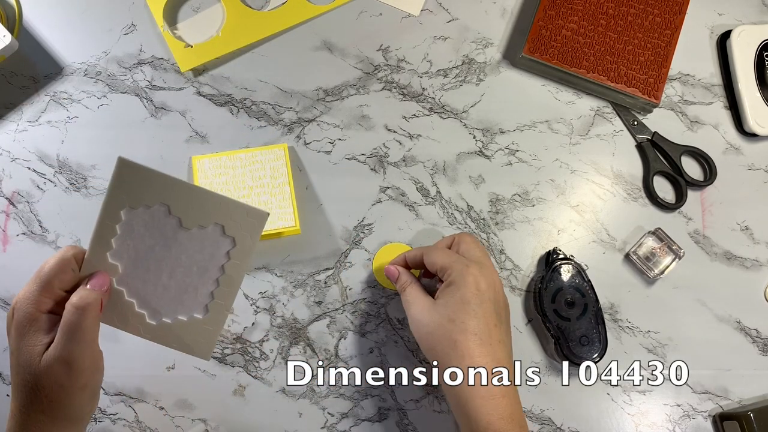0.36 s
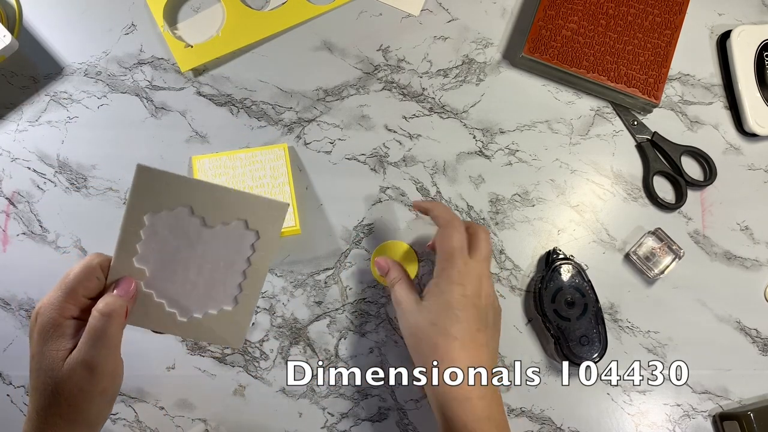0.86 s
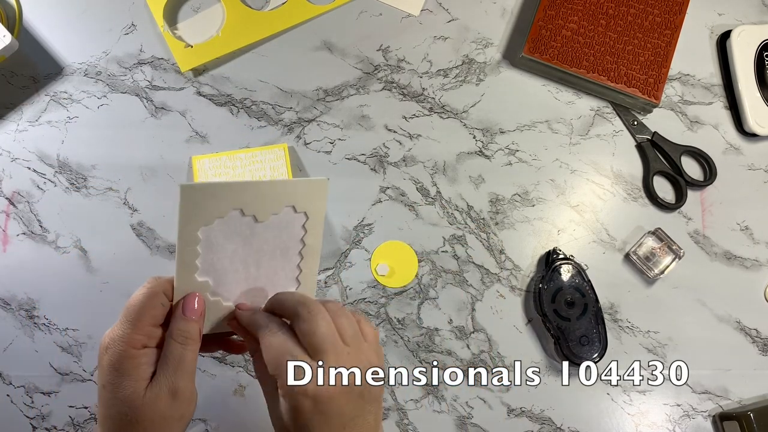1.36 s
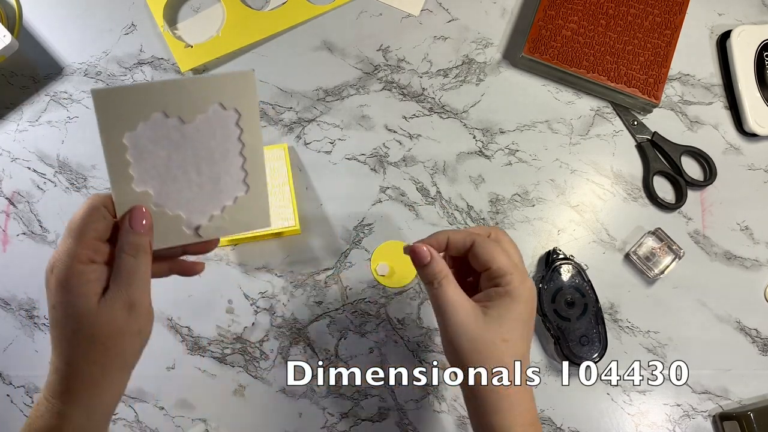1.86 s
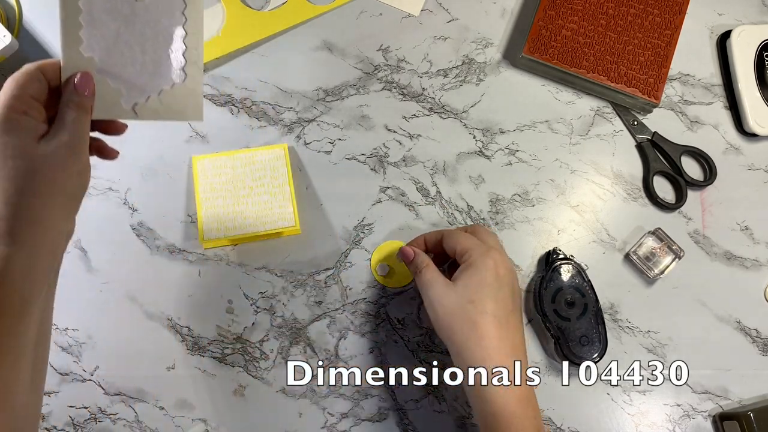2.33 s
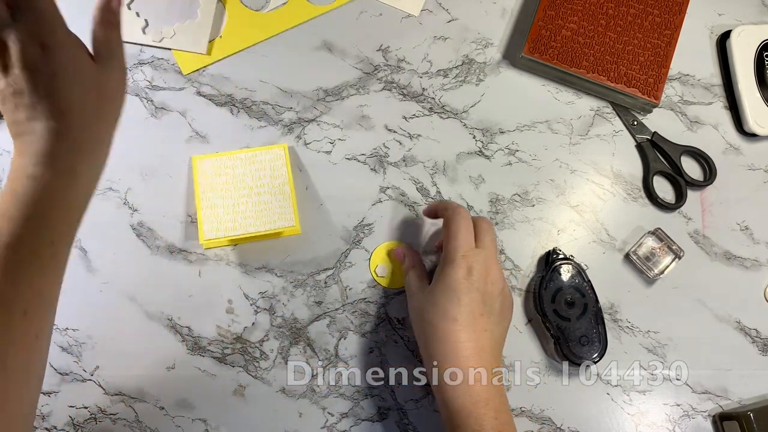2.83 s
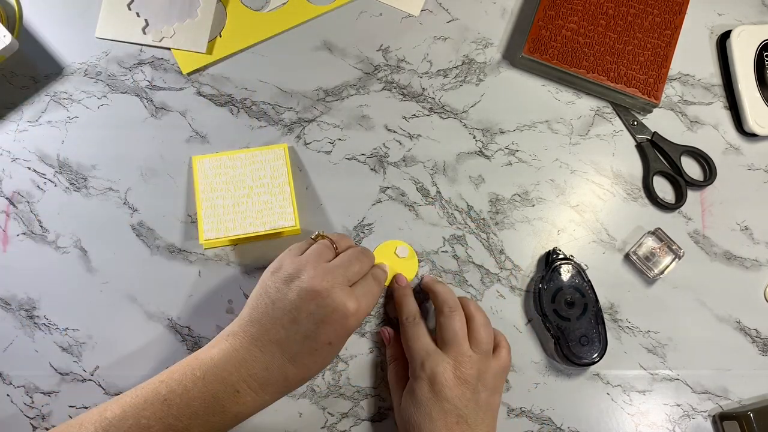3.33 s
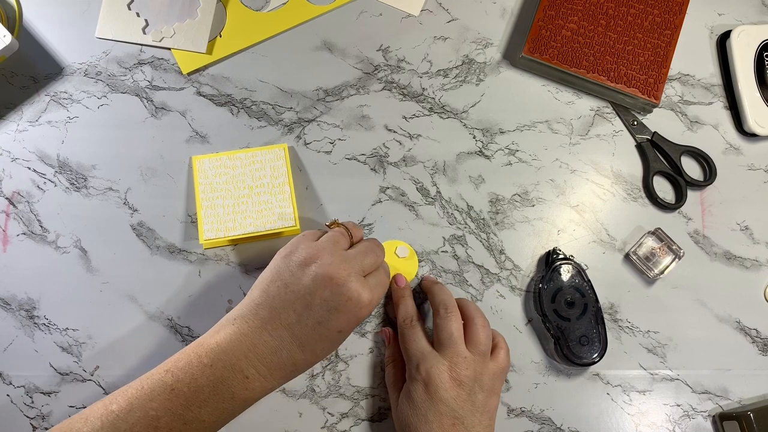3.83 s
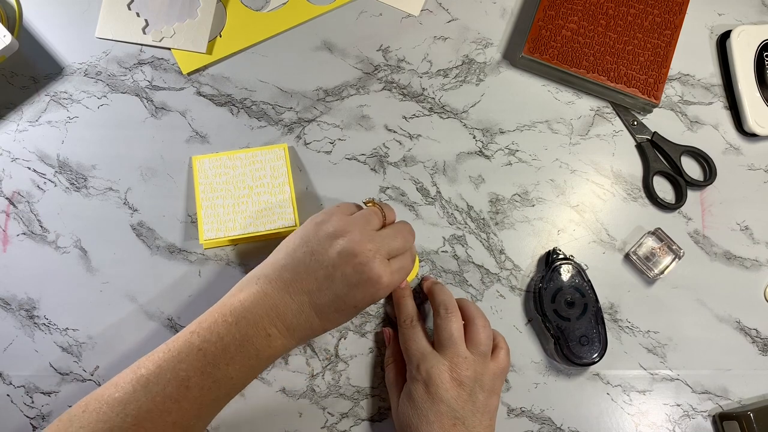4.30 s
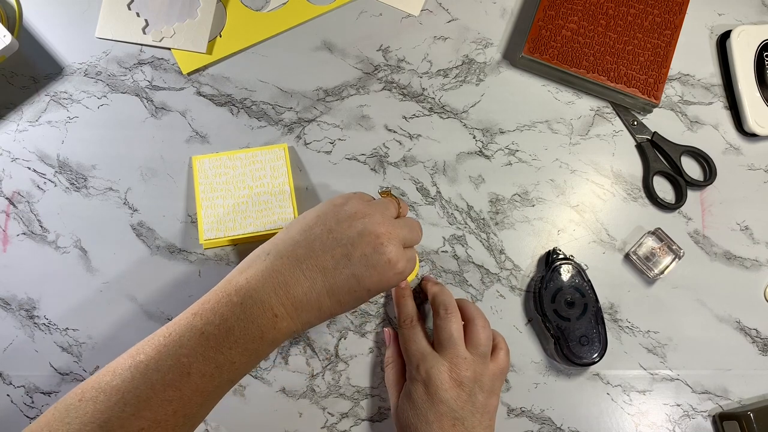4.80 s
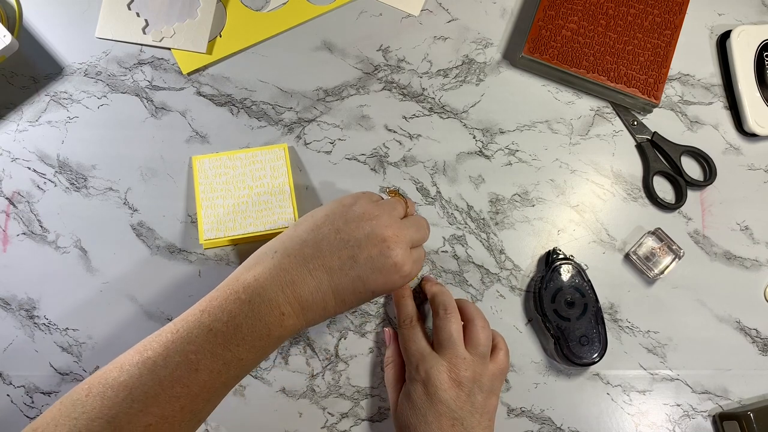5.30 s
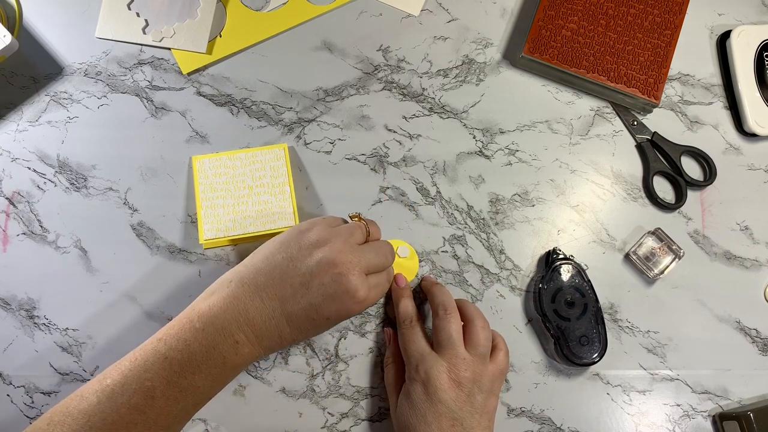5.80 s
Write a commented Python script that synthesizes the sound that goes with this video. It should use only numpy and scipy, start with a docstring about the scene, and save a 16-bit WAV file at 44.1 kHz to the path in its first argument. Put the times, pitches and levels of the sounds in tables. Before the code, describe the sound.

Close, faint craft-table handling: crisp adhesive clicks, card knocks and rustling in two early bursts, then sparse little ticks over low room rumble.

```python
"""Glue stretches and a card sheet rustles at once, as fingers peel small foam pads off the sheet and
press them onto paper on a hard table. Snaps and nail ticks are short noise bursts; the card and the
table ring as fading sine waves; rubbing and slides are shaped noise.
A small damped room adds dense echoes, a low rumble and a faint hiss. Two microphone ports, a hand apart."""
import sys
import numpy as np
from scipy import signal
from scipy.fft import rfft, irfft
from scipy.io import wavfile
from scipy.ndimage import uniform_filter1d

SR = 44100
rng = np.random.default_rng(int(sys.argv[2]) if len(sys.argv) > 2 else 0)


def inscribe(sig):
    """Save sig as 16-bit PCM at rate SR to the path in sys.argv[1].

    A 1-D sig is mono; a 2-D sig holds one channel per row.
    Samples are clipped to [-1, 1] before scaling.
    """
    pcm = np.round(np.clip(np.atleast_2d(sig).T, -1, 1) * 32767)
    wavfile.write(sys.argv[1], SR, pcm.astype(np.int16))


def rack_gain(trim_db):
    """Turn a fader trim in dB into the linear factor to multiply a signal by."""
    fader = np.asarray(trim_db, float)
    return 10 ** (fader / 20)


N = 271479   # length in samples

# strokes that stretch glue threads and slide skin on paper: loudest t/s, level/dB, swell t/s, fade t/s
PEEL_STROKES = [(.002, -50.5, .05, 0.078), (.12, -55.5, .15, 0.048), (.25, -72.5, .5, 0.28),
                (.7, -80.5, .2, 0.51), (.761, -57, 0.031, 0.023), (1.48, -67.5, 0.025, 0.3),
                (1.595, -48.5, .03, 0.14), (1.665, -54, .045, 0.1), (2.82, -52.5, .05, 0.097),
                (4.0, -62.5, .03, 0.14), (4.04, -62.5, 0.045, 0.14), (4.095, -51, .02, .006),
                (4.105, -60, .01, 0.094), (4.31, -76.5, .09, .12), (5.146, -56.5, .015, 0.018),
                (5.157, -67, 0.011, 0.037), (5.2, -83, .06, 0.039), (5.385, -69.5, 0.0097, 0.026),
                (5.419, -52, .007, 0.065), (5.45, -68, .04, 0.066)]
# strokes that flex and rustle the card sheet: loudest t/s, level/dB, swell t/s, fade t/s
RUSTLE_STROKES = [(.05, -56, 0.21, 0.11), (.13, -55, 0.08, 0.19), (.23, -68, 0.22, 0.049),
                  (.33, -72, 0.26, 0.083), (1.225, -68, 0.03, 0.077), (1.49, -72, 0.064, 0.051),
                  (1.58, -55.5, 0.032, 0.097), (1.645, -50.5, 0.012, 0.049), (1.675, -51.5, 0.03, 0.044),
                  (1.70, -49, 0.015, 0.055), (2.81, -67, 0.041, 0.082), (2.86, -64.5, 0.079, 0.02),
                  (4.105, -66, 0.023, 0.11), (5.446, -67.5, 0.065, 0.057), (5.155, -78, .015, 0.034),
                  (5.767, -70, 0.016, 0.034), (.77, -71, 0.016, 0.065)]
# colour of the peeling glue: f/Hz, relative level per Hz/dB
BRIGHT_COLOUR = [(2500, -13), (5000, -5.5), (8000, -8.5), (12000, -5.5), (16000, -14)]
# colour of the rustling sheet: f/Hz, relative level per Hz/dB
DULL_COLOUR = [(240, -37), (400, -4), (1050, -12.5), (1390, -5), (2040, -11.5), (3310, -24.5),
               (5000, -25.5), (6500, -44), (11000, -120)]
# a hand slides on the table or the sheet and excites one resonance:
# loudest t/s, level before uneven grip/dB, swell t/s, fade t/s, centre f/Hz, half width/share of centre
HAND_SLIDES = [(0.072, -53, 0.13, 0.21, 2080, 0.18), (0.31, -77, 0.16, 0.1, 2500, 0.038),
               (0.11, -59.5, 0.091, 0.22, 1000, 0.087), (0.13, -70, .2, 0.12, 3000, 0.32),
               (.07, -57.5, .08, .25, 600, 0.17), (4.53, -80, 0.12, 0.3, 617, 0.06),
               (5.38, -75, .09, .05, 700, .3), (4.74, -83.5, 0.15, 0.089, 613, 0.05),
               (2.862, -65, 0.042, 0.029, 4000, 0.22), (1.275, -66, 0.0058, 0.0098, 3100, 0.099),
               (4.55, -80, 0.18, 0.11, 900, 0.27), (5.421, -62, .008, .03, 4570, 0.042),
               (5.447, -61.5, .006, .015, 4600, 0.052), (5.762, -54.5, 0.012, 0.024, 7440, 0.15),
               (1.3, -71, 0.18, 0.16, 422, 0.08)]
# colour of rumble and hiss: f/Hz, relative level per Hz/dB
ROOM_TONE_COLOUR = [(15, -30), (25, -11), (45, -5.5), (62, 1.5), (85, -2), (105, -9), (122, -4), (145, -11),
                    (224, -12.5), (290, -16.5), (382, -25), (480, -34.5), (888, -45.5), (1700, -51.5),
                    (4000, -54), (8400, -56), (12000, -55.5), (14800, -56), (16000, -68)]
# how alike the room tone is at left and right: f/Hz, likeness/0 to 1
ROOM_TONE_LIKENESS = [(30, 0.52), (60, 0.88), (180, 0.91), (550, 0.28), (1650, 0.74), (4970, 0.1),
                      (15000, 0.4)]
# nails and knuckles knock the card:
# t/s, card ring level/dB, tick level/dB, crack level/dB, f above which the ring weakens/Hz
CARD_KNOCKS = [(0.0166, -46, -64.5, -63.5, 3000), (0.0297, -40, -65, -57, 3000),
               (0.0392, -45, -55, -35.5, 2000), (1.215, -45, -85, -53, 3010), (1.2252, -44, -90, -82, 1010),
               (1.2285, -45, -90, -82, 980), (1.2735, -54.5, -60.5, -63, 1110),
               (1.483, -40, -64, -49.5, 2080), (1.5778, -38, -43, -35.5, 2980),
               (1.5832, -58, -60.5, -45, 3000), (1.5965, -43.5, -51.5, -58, 2000),
               (1.6011, -44, -38.5, -39.5, 3000), (1.6401, -37.5, -63, -49, 1210),
               (1.654, -32.5, -54, -43.5, 1200), (1.6565, -37.5, -68.5, -62, 1000),
               (1.6741, -38, -60, -57.5, 1180), (1.6847, -46, -57.5, -61.5, 2000),
               (1.6945, -42.5, -59.5, -50, 1475), (1.7095, -33.5, -57.5, -42, 1200),
               (1.7123, -32.5, -46.5, -37.5, 1510), (1.7153, -36, -54.5, -55.5, 1200),
               (1.7183, -39.5, -60, -49, 1200), (2.8225, -59, -66, -50, 2470),
               (2.8495, -59, -41, -43.5, 2500), (2.8583, -61, -40, -42, 3000),
               (3.309, -65.5, -53, -53, 1175), (3.3117, -47.5, -57.5, -60.5, 452),
               (4.0973, -46.5, -59.5, -44.5, 1800), (5.1542, -63.5, -71, -86, 2000),
               (5.761, -67.5, -67, -67.5, 2500), (5.77, -77, -56.5, -66, 2500),
               (5.797, -75, -78, -73, 2500)]
# glue threads snap at the fingertips: t/s, bright snap level/dB, crack level/dB, snap centre f/Hz
GLUE_SNAPS = [(0.0171, -25.5, -39.5, 11500), (0.0306, -22.5, -37, 11580), (0.03, -31.5, -38.5, 6530),
              (0.038, -33, -49, 12000), (0.584, -60, -88, 7700), (0.593, -60, -82, 6900),
              (0.7629, -31.5, -51, 8700), (0.7657, -51, -47.5, 8100), (1.3094, -49.5, -65, 10300),
              (1.4288, -64, -73.5, 8440), (1.452, -56.5, -70, 11400), (1.4693, -45.5, -57, 11500),
              (1.471, -33.5, -75, 12000), (1.4785, -42, -50.5, 10000), (1.4937, -45.5, -52.5, 11500),
              (1.4958, -46.5, -49, 11500), (1.522, -44, -50.5, 10300), (1.542, -41.5, -48, 11000),
              (1.5792, -26.5, -42.5, 11500), (1.597, -37.5, -46.5, 7000), (1.6012, -34, -49, 10980),
              (1.6393, -35, -40, 10500), (1.6547, -25.5, -36, 11000), (1.66, -38, -51.5, 9000),
              (1.6666, -24.5, -39.5, 8540), (1.668, -31, -30.5, 7910), (1.6748, -26.5, -47.5, 10800),
              (1.6844, -28, -46, 11400), (2.33, -63, -71, 10440), (2.6414, -64.5, -92, 8860),
              (2.7925, -58, -64, 7450), (2.814, -41, -53, 6000), (2.8141, -28.5, -45, 10750),
              (2.818, -40, -57, 8050), (2.915, -65.5, -76, 8000), (3.229, -58, -74, 11500),
              (3.515, -44.5, -69, 8840), (3.7389, -57, -69, 9750), (3.757, -32, -68, 11800),
              (3.989, -51, -81, 13250), (4.0008, -54.5, -74.5, 9900), (4.0128, -53, -64.5, 8700),
              (4.0204, -37, -64, 9600), (4.058, -58.5, -60.5, 7840), (4.0935, -36.5, -46, 7000),
              (4.0972, -28, -52.5, 11000), (4.0956, -28.5, -42, 5770), (4.097, -22, -42, 8800),
              (4.0995, -40, -46.5, 7000), (4.4722, -51.5, -61.5, 8400), (5.1467, -50, -64, 8000),
              (5.1544, -46, -82, 11000), (5.181, -59.5, -82, 10150), (5.2052, -64, -90, 9660),
              (5.4115, -54.5, -68, 12000), (5.4178, -53.5, -69, 5500), (5.427, -53, -67, 10500),
              (5.4429, -53, -59, 9500), (5.4446, -53, -47.5, 8500), (5.4463, -42, -69, 9000),
              (5.782, -59, -80, 11000), (5.9568, -34, -63, 8600)]
# ways the card sheet rings: f/Hz, relative level/dB, time to fall 60 dB t/s
CARD_MODES = [(446, -13.5, 0.02), (563.8, -8.5, 0.014), (633, -6, 0.015), (787, -5.5, 0.023),
              (880, -3, 0.019), (1005, -4.5, 0.02), (1075, -6.5, 0.017), (1330, -11, 0.015),
              (1646, -4, 0.025), (1950, -10, 0.018), (2360, -12.5, 0.021), (2580, -16.5, 0.018),
              (2780, -19, 0.015)]
# the hand lands on the table: t/s, level/dB
TABLE_THUDS = [(0.037, -44), (1.224, -47), (1.6, -50), (1.654, -37.5), (1.709, -35.5), (2.815, -49),
               (3.311, -36.5), (4.1, -47)]
# ways the table rings: f/Hz, relative level/dB, time to fall 60 dB t/s
TABLE_MODES = [(146, -3, 0.043), (181, -1.5, .05), (226, 1, 0.06), (262, -2.5, 0.059), (286, -1, 0.038),
               (350, -4, 0.036), (400, -5, 0.035), (455, -5, 0.055)]
# echoes by band: centre f/Hz, time to fall 60 dB t/s, noise level before cutting to the band/dB,
# left-right likeness/0 to 1
ECHO_BANDS = [(307, 0.13, -4.5, .85), (1250, 0.12, -5.5, .8), (2930, 0.1, -4.5, 0.57),
              (5500, 0.11, -7, 0.6), (9000, 0.079, -7.5, 0.93), (12700, 0.17, -10, 0.55)]
# narrow gaps in the treble: from f/Hz, to f/Hz
TREBLE_GAPS = [(9150, 10150), (12800, 13900)]

TOP_HZ = 16200   # steep upper end of the sound
ROOM_TONE_DB = -51.5
FINGERS_LAG_MS = -0.28   # left lag: the fingertips are nearer the left port
RING_LAG_MS = -0.027   # left lag of the card's ring
RING_UNDER_CRACK_DB = -26.5   # how much of a crack sets the card ringing
NAIL_HZ = 5400   # centre of a nail's tick
STROKE_RANGE_DB, STROKE_BEND = 30, 1.5   # dB lost in a swell or fade time; loss quickens away from the peak
CARD_SPREAD_DB = 4   # each blow finds each card mode stronger or weaker by this spread
BENDING_DELAY_MS = 1.5   # bending waves of 1 kHz arrive this late; lower ones later, higher ones sooner
SKID_DB, SKIDS_PER_S = 3.5, 40   # the skin grips unevenly: spread and rate


def rms_one(x):
    """Scales a sound to rms 1."""
    return x / np.sqrt(np.mean(x ** 2) + 1e-20)


def at_hz(points, hz):
    """Reads a table at any frequency, along a log frequency scale."""
    table_hz, value = np.array(points).T
    return np.interp(np.log(hz + 1), np.log(table_hz), value)


def coloured(noise, spectrum):
    """Gives noise a spectrum in dB per Hz, at rms 1."""
    size = noise.shape[-1]
    gain = rack_gain(at_hz(spectrum, np.fft.rfftfreq(size, 1 / SR)))
    return rms_one(irfft(rfft(noise) * gain, size))


def band(x, low_hz, high_hz):
    """Keeps only the frequencies from low_hz to high_hz, with soft edges."""
    edges = [low_hz, min(high_hz, .45 * SR)]
    return signal.sosfilt(signal.butter(2, edges, "band", fs=SR, output="sos"), x)


def left_and_right(mid, side, alike):
    """Mixes two independent noises into two channels that are alike by a share of 0 to 1."""
    alike = np.clip(alike, 0, 1)
    return np.sqrt(1 + alike) * mid + np.sqrt(1 - alike) * side * [[1], [-1]]


def add(out, s, sound, left_lag_ms=0.):
    """Lays a sound into both channels, the nearer port first."""
    sound = np.broadcast_to(sound, (2, sound.shape[-1]))
    for channel, shift in enumerate((left_lag_ms / 2000, -left_lag_ms / 2000)):
        at = max(round((s + shift) * SR), 0)   # nothing can start before zero
        out[channel, at:at + sound.shape[-1]] += sound[channel, :N - at]


def strokes(rows):
    """Each stroke swells to its loudest moment and fades; overlapping strokes add in power."""
    t = np.arange(0, N + 8, 8) / SR   # every eighth sample is enough
    power = 0
    for s, level_db, swell, fade in rows:
        away = np.maximum((s - t) / swell, (t - s) / fade)
        power = power + rack_gain(level_db - STROKE_RANGE_DB * away ** STROKE_BEND) ** 2
    return np.interp(np.arange(N) / SR, t, np.sqrt(power))


def grains(rows, spectrum, per_s, spread_db, smooth, unlike):
    """Fibres catch and let go at random: uneven clicks over a smoother hiss, under the strokes of the hand."""
    sizes = rack_gain(spread_db * np.minimum(rng.exponential(1, N), 4)) * rng.choice([-1, 1], N)
    clicks = rms_one(sizes * (rng.random(N) < per_s / SR))
    hiss = rng.standard_normal((3, N))   # one shared by both ports, then one for each
    rough = clicks + smooth * (hiss[0] + unlike * hiss[1:])
    return coloured(rough, spectrum) * strokes(rows)


def rubbing():
    """Rubbing makes many tiny catches: glue peels nearer the left port, the sheet rustles in the middle."""
    out = np.zeros((2, N))
    peel = grains(PEEL_STROKES, BRIGHT_COLOUR, per_s=1500, spread_db=5.5, smooth=1.2, unlike=0.5)
    add(out, 0, peel, FINGERS_LAG_MS)   # the left cannot start early here, so half the lag remains
    rustle = grains(RUSTLE_STROKES, DULL_COLOUR, per_s=1100, spread_db=4.0, smooth=0.48, unlike=0.17)
    return out + rustle


def slides():
    """Skin drags over a surface: soft noise in a resonance, gripping unevenly, under the stroke."""
    t, out = np.arange(N) / SR, 0
    for *row, hz, width in HAND_SLIDES:
        grip = rack_gain(SKID_DB * np.interp(t * SKIDS_PER_S, np.arange(999), rng.standard_normal(999)))
        resonance = rms_one(band(rng.standard_normal(N), hz * (1 - width), hz * (1 + width)))
        out = out + strokes([row]) * grip * resonance
    return out


def room_tone():
    """Rumble of the house over a faint hiss; how alike the two ports are depends on the frequency."""
    hz = np.fft.rfftfreq(N, 1 / SR)
    mid, side = rfft(rng.standard_normal((2, N)))
    both = left_and_right(mid, side, at_hz(ROOM_TONE_LIKENESS, hz))
    return rack_gain(ROOM_TONE_DB) * rms_one(irfft(both * rack_gain(at_hz(ROOM_TONE_COLOUR, hz)), N))


def burst(low_hz, high_hz, decay_ms, lead_ms, unlike):
    """A click with a faint noise rising to it and dying after it; the loudest millisecond has rms 1."""
    t = np.arange(SR // 40) * 1000 / SR - 6   # milliseconds from the click
    noise = rng.standard_normal((3, len(t)))
    envelope = np.where(t > 0, np.exp(-t / decay_ms), 0.16 * np.exp(t / lead_ms))
    noisy_click = (noise[0] + unlike * noise[1:]) * envelope
    noisy_click[:, np.argmax(t > 0)] += 2.2   # the click itself
    puff = band(noisy_click, low_hz, high_hz)
    return puff / np.sqrt(uniform_filter1d(np.mean(puff ** 2, axis=0), size=SR // 1000).max())


def add_click(out, s, bright_db, crack_db, hz):
    """A bright tick around a centre pitch at the fingertips, and the duller crack of the card under it."""
    tick = burst(max(0.65 * hz, 3000), 1.4 * hz, decay_ms=0.45, lead_ms=1.5, unlike=0.35)
    crack = burst(900, 4000, decay_ms=1.2, lead_ms=2.5, unlike=0.3)
    start = s - .0063   # room for the noise that leads up to the click
    add(out, start, rack_gain(bright_db) * tick, FINGERS_LAG_MS)
    add(out, start, rack_gain(crack_db) * crack)


def strike(modes, spread_db, contact_ms, top_hz, delay_ms):
    """One soft blow on a set of modes, each with a strength of its own, weak above top_hz; low modes set in later."""
    hz, level_db, t60 = np.transpose(modes)[:, :, None]
    t = np.maximum(np.arange(SR // 10) / SR - delay_ms / 1000 * np.sqrt(1000 / hz), 0)
    strength = rack_gain(level_db + rng.normal(0, spread_db, hz.shape)) * rng.choice([-1, 1], hz.shape)
    strength = strength / (1 + (hz / top_hz) ** 4)
    onset = 1 - np.exp(-t * 1000 / contact_ms)
    rings = np.sum(strength * rack_gain(-60 * t / t60) * np.sin(2 * np.pi * hz * t) * onset, axis=0)
    return rings / np.sqrt(2 * np.mean(rings[:SR // 150] ** 2))   # level set by the first moments


def knocks():
    """The sheet ticks under the nail, cracks and rings when it is knocked; a softer contact rings duller."""
    out = np.zeros((2, N))
    for s, ring_db, tick_db, crack_db, top_hz in CARD_KNOCKS:
        add_click(out, s, tick_db, crack_db, NAIL_HZ)
        ring = strike(CARD_MODES, CARD_SPREAD_DB, 0.6, top_hz, BENDING_DELAY_MS)
        add(out, s - .0021, rack_gain(ring_db) * ring, RING_LAG_MS)
    return out


def snaps():
    """A glue thread lets go: a bright snap at the fingertips; the card cracks dully and rings a little."""
    out = np.zeros((2, N))
    for s, snap_db, crack_db, hz in GLUE_SNAPS:
        add_click(out, s, snap_db, crack_db, hz)
        ring = strike(CARD_MODES, CARD_SPREAD_DB, 0.54, 3000, BENDING_DELAY_MS)
        add(out, s - .0011, rack_gain(crack_db + RING_UNDER_CRACK_DB) * ring, RING_LAG_MS)
    return out


def thuds():
    """The hand lands on the table top and sets its low modes ringing."""
    out = np.zeros((2, N))
    for s, level_db in TABLE_THUDS:
        thud = strike(TABLE_MODES, spread_db=3.0, contact_ms=2.1, top_hz=900, delay_ms=0.0)
        add(out, s, rack_gain(level_db) * thud)
    return out


def room(x):
    """Dense echoes from table and walls: noise that dies band by band, each with its own left-right likeness."""
    t = np.arange(SR // 3) / SR
    centres = np.array(ECHO_BANDS)[:, 0]
    edges = np.concatenate([[60], np.sqrt(centres[1:] * centres[:-1]), [18000]])
    echoes = 0
    for (hz, t60, echo_db, alike), low, high in zip(ECHO_BANDS, edges, edges[1:]):
        envelope = rack_gain(-60 * t / t60) * np.clip(t / 0.0064, 0, 1)   # builds up over 6.4 ms
        mid, side = rng.standard_normal((2, len(t))) * envelope
        dying = left_and_right(mid, side, alike)
        dying = dying / np.sqrt(np.sum(dying[0] ** 2))
        echoes = echoes + rack_gain(echo_db) * band(dying, low, high)
    return signal.fftconvolve(x, echoes, axes=1)[:, :N]


def scene():
    """The hands' sounds, their echoes and the room tone together."""
    hands = rubbing() + slides() + knocks() + snaps() + thuds()
    return hands + room(hands) + room_tone()


def top_cut(x):
    """Nothing passes above the cut-off."""
    return signal.sosfilt(signal.butter(12, 16810, fs=SR, output="sos"), x)


def record(dry):
    """Filters cut narrow gaps into the treble and give it a steep upper end."""
    for low_hz, high_hz in TREBLE_GAPS:
        gap = signal.butter(3, [low_hz, high_hz], "bandstop", fs=SR, output="sos")
        dry = signal.sosfilt(gap, dry)
    mix = signal.sosfilt(signal.butter(12, TOP_HZ, fs=SR, output="sos"), dry)
    return top_cut(mix)


dry = scene()
out = record(dry)
inscribe(out)
```